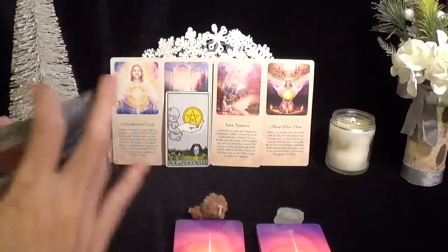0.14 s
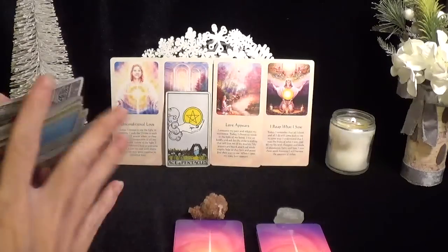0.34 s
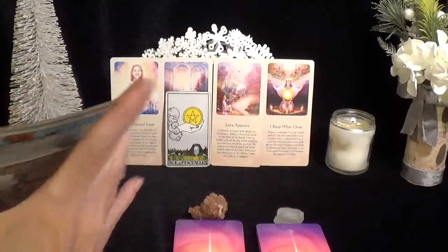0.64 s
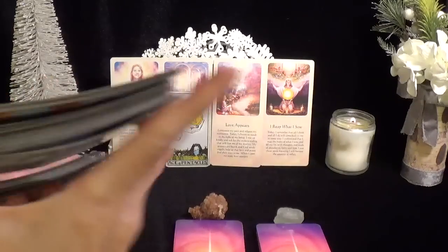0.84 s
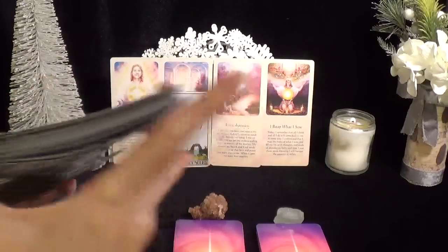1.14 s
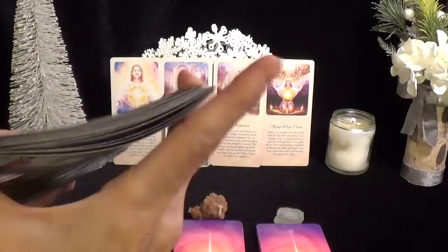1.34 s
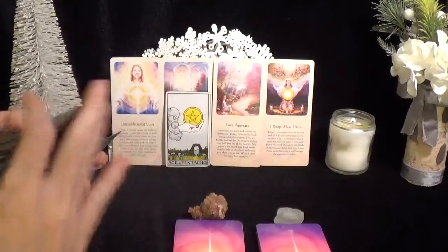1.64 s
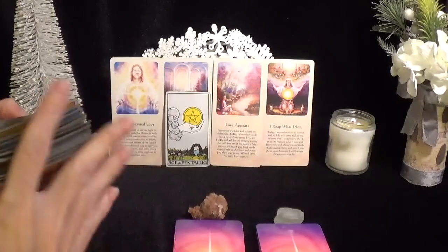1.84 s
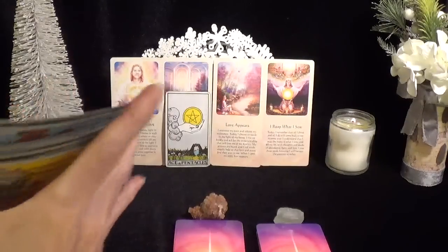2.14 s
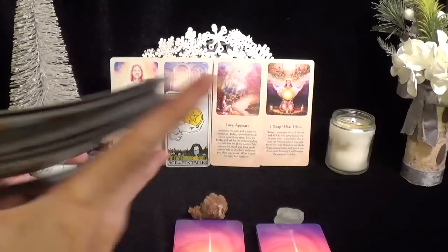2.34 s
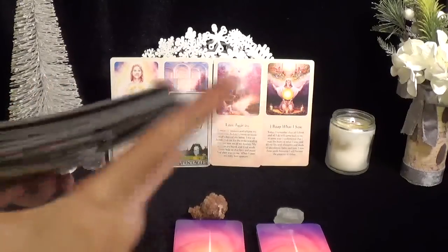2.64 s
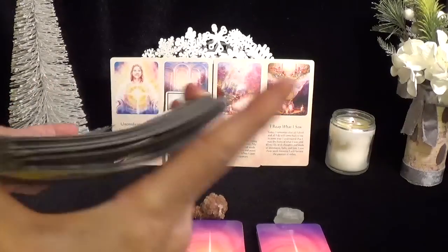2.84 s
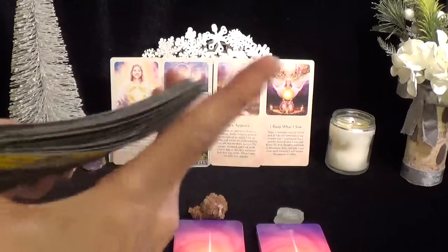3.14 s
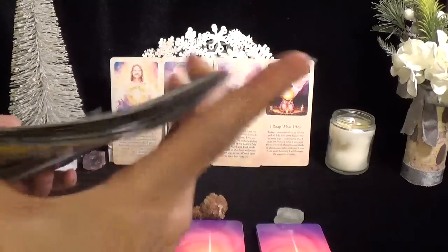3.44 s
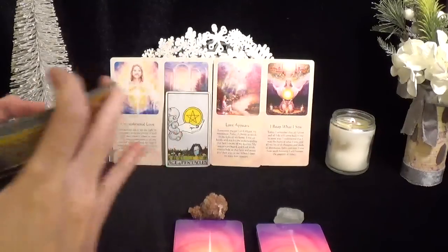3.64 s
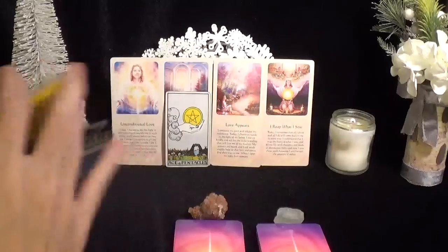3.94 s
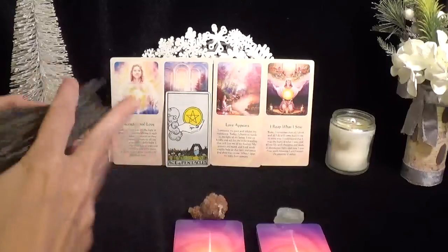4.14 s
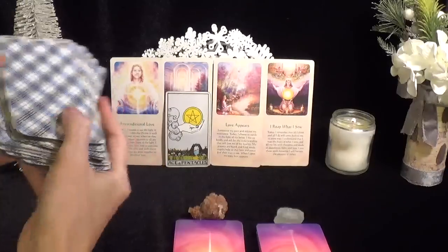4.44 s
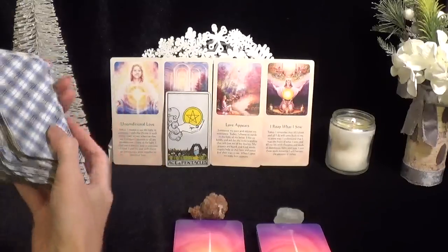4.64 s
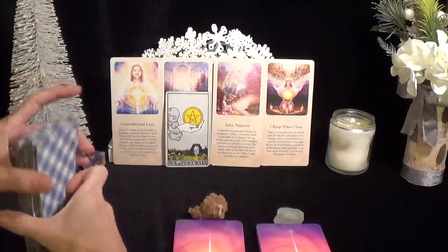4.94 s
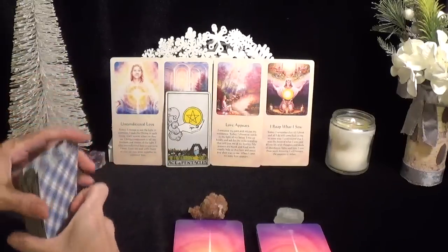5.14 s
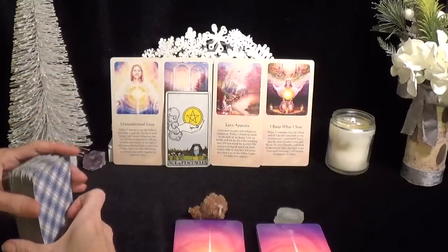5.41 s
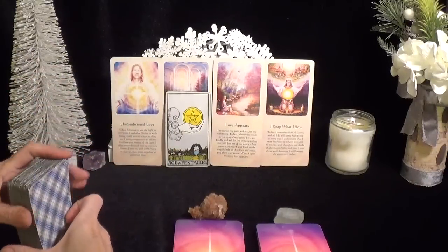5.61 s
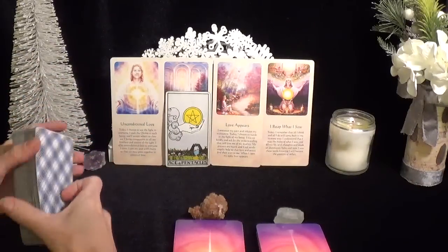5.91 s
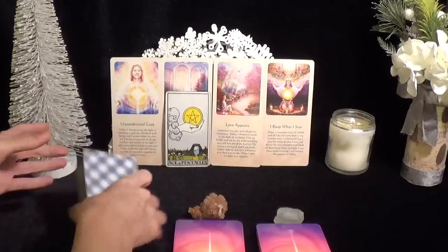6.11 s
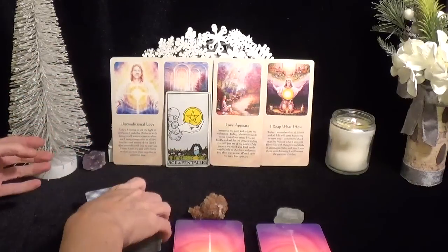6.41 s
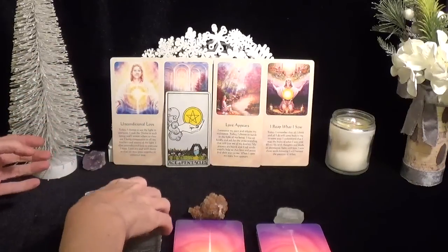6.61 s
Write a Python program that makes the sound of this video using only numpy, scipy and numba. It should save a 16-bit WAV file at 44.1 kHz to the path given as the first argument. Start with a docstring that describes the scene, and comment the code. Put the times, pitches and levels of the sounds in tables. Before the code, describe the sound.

From the start, stiff cards are shuffled by hand, close to the microphone and slightly to the left. Their faces slide with a dry, papery rub, edges snap free, and packets drop into the palm with small hollow thuds. The sharpest flurries of snaps come at about 1 to 1.5 seconds, 2.5 to 2.9 seconds and 3 to 3.7 seconds. After 4 seconds the handling thins to lighter slides and scattered clicks. At about 5.2 and 5.6 seconds the deck is knocked square on a wooden table, giving two soft, briefly ringing knocks, the first a little clattery. At 6.4 seconds it is laid down gently. The small room adds a slight, short echo. Underneath run quiet room air, a low hum and a very faint, rapid mechanical ticking, which stops with one slightly louder tick near 6.6 seconds.

```python
"""A quiet room hums; a camera ticks once a frame. For the first 5 s, close by and a little to the left,
hands shuffle stiff cards: faces rub in stick-slip strokes, edges snap free and ring, packets drop
into the palm with a hollow thud. From 5.2 s the deck is knocked square on a wooden table, ringing
the modes of the top; at 6.4 s it is laid down. The small room echoes cards and table.
At 6.6 s the camera stops with a last, louder tick."""
import sys
import numpy as np
from scipy import signal
from scipy.fft import rfft, irfft
from scipy.io import wavfile
from scipy.ndimage import uniform_filter1d
from numba import njit

SR = 44100
rng = np.random.default_rng(int(sys.argv[2]) if len(sys.argv) > 2 else 0)


def to_wav(s):
    """Save 16-bit WAV."""
    ch = np.atleast_2d(s).T  # columns
    pcm = np.round(np.clip(ch, -1, 1) * 32767)  # PCM
    wavfile.write(sys.argv[1], SR, pcm.astype(np.int16))


N = 298557

# room tone spectrum (frequency [Hz], relative density [dB])
AIR_SPECTRUM = [(15, -36.5), (25, -18), (54, -7), (128, -10), (192, -12.5), (247, -15.5), (274, -14.5),
                (651, -20.5), (819, -20), (1030, -21), (1300, -24.5), (3240, -28.5), (11000, -42),
                (14300, -59), (22000, -120)]
# low hum envelope (time [s], level [dB])
HUM_LEVELS = [(0, -65.5), (4.6, -65.5), (4.8, -78), (5.7, -58.5), (6.1, -73.5), (6.77, -79.5)]
# table top modes (frequency [Hz], gain [dB], t60 [s])
WOOD_MODES = [(129, 3.5, 0.13), (136.9, -5.5, 0.36), (146.6, -13.5, 0.39), (164.7, -10.5, .18),
              (217, -11.5, 0.13), (321, -14.5, 0.18), (542, -13.5, 0.18), (581, 3.5, 0.058),
              (668, -0.5, 0.036), (846, -13.5, 0.17), (966, -8.5, 0.075), (1267, -17, 0.079),
              (1490, -12, 0.041), (1880, -16.5, 0.07)]
# deck on table (time [s], strength [dB], push length [ms], edge clack [dB])
DECK_KNOCKS = [(5.202, -25, 0.25, -24.5), (5.212, -34, 1.4, -25.5), (5.223, -19.5, 1.12, -30),
               (5.245, -38, 0.59, -37), (5.569, -35.5, 1.4, -51), (5.576, -17, 2.67, -36.5),
               (5.596, -40, 0.99, -52), (5.998, -53.5, 1.85, -48), (6.399, -36, 4.3, -44.5)]
# packets landing in the palm (time [s], peak [dB], pitch [Hz])
PALM_THUDS = [(0.125, -49, 509), (0.258, -47, 483), (0.705, -41, 202.6), (0.968, -36.5, 189),
              (1.008, -40, 349), (1.288, -36.5, 424), (2.276, -45, 263), (2.529, -22.5, 514),
              (2.595, -44, 504), (3.384, -38.5, 405), (4.71, -40, 850)]
# fingers on the deck between strokes (time [s], level [dB], hiss re level [dB])
FINGER_LEVELS = [(0, -52.5, -3.5), (.7, -61.5, 4.5), (.9, -66, 1.5), (1.5, -64.5, 1.5), (1.7, -64, 6),
                 (2.1, -58.5, 0), (2.4, -65, -1.5), (3.5, -61.5, 1.5), (4.1, -57, -1.5), (4.4, -69, 8),
                 (4.75, -67.5, -3), (4.9, -72, 2.5), (5.8, -70, 2.5), (6.1, -77, 5), (6.77, -83.5, 10.5)]
# card faces sliding (start [s], hold [s], level [dB], hiss re level [dB])
SLIDE_STROKES = [(0.0, 0.0026, -47, -12), (0.085, 0.072, -48, -5), (0.19, 0.021, -45, 1),
                 (0.29, 0.025, -43.5, -1), (0.515, 0.017, -51, -12), (0.66, 0.14, -49.5, -2),
                 (0.775, 0.0069, -39.5, -3.5), (0.975, 0.016, -47, 1), (1.005, 0.0065, -35, -7),
                 (1.225, 0.066, -42, -23), (1.3, 0.022, -36, -13), (1.4, 0.025, -52.5, -17),
                 (1.515, 0.014, -31.5, -14), (1.56, 0.048, -46.5, -1), (1.7, .035, -55.5, -7),
                 (1.79, 0.055, -56.5, 4.5), (1.901, 0.035, -53, 6.5), (1.99, 0.0092, -55.5, 2.5),
                 (2.041, 0.024, -56, 0), (2.15, 0.032, -49.5, -11), (2.21, 0.053, -47, 3),
                 (2.473, .01, -46, -9), (2.482, 0.0038, -32, -8.5), (2.522, 0.0053, -29, -14),
                 (2.758, 0.019, -42.5, -19), (2.792, 0.031, -39, -9.5), (2.84, 0.035, -43.5, -15),
                 (3.05, 0.038, -54.5, -12), (3.093, 0.023, -34, -10), (3.122, 0.029, -36.5, -12),
                 (3.31, 0.072, -43.5, -12), (3.4, 0.032, -33, -30), (3.617, 0.011, -33.5, -27),
                 (3.655, 0.039, -38.5, -6), (3.715, 0.031, -46, -7), (3.787, 0.084, -53, -5.5),
                 (3.925, 0.062, -46, -2), (4.02, 0.037, -64, -20), (4.08, 0.022, -49.5, 3.5),
                 (4.155, 0.025, -44.5, -14), (4.22, 0.023, -57, 0), (4.33, 0.023, -54, -4.5),
                 (4.48, 0.06, -69, 2), (4.619, .05, -59.5, 5.5), (4.698, 0.03, -45.5, -4.5),
                 (4.99, 0.058, -65.5, 5), (5.21, 0.052, -62, 5.5), (5.386, 0.015, -67, 7),
                 (5.578, 0.012, -64, 5.5), (5.864, 0.028, -66, -1), (5.995, 0.0061, -62.5, 7),
                 (6.385, 0.015, -70.5, 9.5), (6.465, 0.012, -64, 3)]
# card modes (frequency [Hz], width [Hz], gain [dB])
CARD_RESONANCES = [(510, 40, 1), (1351, 270, 4), (2220, 1300, 3), (2980, 850, -1.5), (3800, 2300, -6)]
# card edges snapping free; final row: the camera's last, louder tick as it stops
# (time [s], ring peak [dB], ring [Hz], crack re ring [dB], slap re ring [dB])
CLICKS = [(0.046, -35.5, 2200, 3, -15), (0.2641, -37, 1368, -14, -3), (0.7048, -38, 3520, 6.5, -7),
          (0.771, -25, 1355, -1.5, -13), (0.7854, -25.5, 2546, 2, -7), (0.9636, -30, 1370, -11, -10),
          (0.9693, -22.5, 1334, 3.5, -9), (1.0041, -24, 4820, -9, -33), (1.0085, -18.5, 1350, -5, -10),
          (1.0503, -28.5, 2460, -19, -13), (1.0608, -30, 1210, -7, -8), (1.2184, -7.5, 2200, -11.5, -22),
          (1.2219, -10.5, 2250, -10.5, -20.5), (1.2918, -23, 1455, -0.5, -11),
          (1.3228, -23, 2280, -20, -11.5), (1.3298, -21, 1850, -9, -15), (1.3695, -37, 1231, 4, 3),
          (1.4956, -26, 2700, -17, -10.5), (1.5088, -25, 2550, -8, -23), (1.5327, -22, 2890, 4, -40),
          (1.5921, -36.5, 2350, 7, -2.5), (1.7951, -43, 3870, 7, -8), (2.0934, -43.5, 1484, 6, -25),
          (2.186, -33, 2597, 4, -29), (2.22, -35.5, 3670, 14.5, -27), (2.273, -34.5, 3640, -3, 1),
          (2.4614, -26, 3720, -14, -15), (2.4816, -16, 2750, -0.5, -13), (2.4896, -17.5, 1340, -5.5, -22),
          (2.5112, -17, 2340, -1.5, -8.5), (2.5228, -14, 2490, -15, -12), (2.5274, -12, 2180, -15, -15),
          (2.5358, -25, 2500, -12.5, -1.5), (2.741, -10, 2160, -37, -20.5), (2.7488, -24, 1965, -17, -13),
          (2.7642, -23, 1250, -26, -15), (2.784, -19, 1320, -30, -31), (2.8065, -24, 3110, -21, -10),
          (2.814, -21, 1870, -22, -15.5), (2.8613, -25, 2620, -31.5, -8), (2.8861, -31, 1350, -4, -6.5),
          (3.0437, -29, 2340, -3.5, -13), (3.0533, -20.5, 2530, -28, -18), (3.0927, -16.5, 2986, 1, -6.5),
          (3.1071, -10.5, 4800, 0, -40), (3.124, -17, 3180, -17, -30), (3.138, -20, 2800, -11, -24),
          (3.146, -16, 2970, -32, -29), (3.298, -34.5, 2265, -9, -5), (3.3081, -21.5, 1430, -6, -17.5),
          (3.3193, -22.5, 2540, -17.5, -21), (3.3517, -23.5, 3088, 0, -16), (3.3996, -18.5, 3166, -24, -27),
          (3.434, -19.5, 3080, -30, -37), (3.6079, -22.5, 2290, -10, -10), (3.6134, -22.5, 3240, -14, -30),
          (3.6407, -22, 1990, -25, -21), (3.6501, -19.5, 3770, 4.5, -42), (3.6575, -21, 2200, -12, -40),
          (3.6634, -18, 3800, 7.5, -37), (3.6697, -19, 3820, -0.5, -34), (3.702, -30, 2430, -17, -32),
          (3.787, -42, 2500, 3, -20), (3.843, -36, 1360, 1.5, -17), (3.925, -34, 2080, -15, -9),
          (4.072, -18, 2680, 2, -17), (4.162, -34, 1560, 1, -14), (4.191, -32, 1550, -2, -16),
          (4.222, -39, 2155, 1, -9), (4.275, -45, 1700, -5, -9), (4.295, -46.5, 1700, 12, -5),
          (4.352, -42.5, 1110, 2, -9), (4.492, -49, 897, -6, -0.5), (4.7011, -38.5, 2055, 7, -7),
          (4.9379, -30.5, 2490, 0, -12), (5.011, -48, 2500, 5, -20), (5.6767, -55, 1550, 10, 10.5),
          (6.584, -48.5, 3100, -12, -32)]

LEFT_RIGHT = np.array([[1], [-1]])
AIR_DB, HUM_HZ, HUM_WIDTH_HZ = -61, 65, 8.9
TICK_START_S, TICK_END_S, TICKS_PER_S = .0012, 6.56, 29.97
TICK_HZ, TICK_WIDTH_HZ, TICK_DB = 3230, 120, -57.5
ROOM_T60_S, ROOM_DAMP, ROOM_DB, ROOM_WIDTH = 0.25, 0.64, -9.5, 0.57
PAN_DB, PAN_FROM_HZ, SCATTER_DB = 3.2, 300, -11.5
PUFF_T60_S, THUD_WIDTH_HZ = .035, 70
RISE_DB_PER_S, LIGHT_DB, RISE_DOUBLES_DB = 600, -50.5, 11.5  # strokes above LIGHT_DB rise faster
FALL_DB_PER_S, SETTLE_DB, SETTLE_DB_PER_S = 550, -14, 153
FLUTTER_PER_S, FLUTTER_FROM_DB = 70, -50
FLUTTER_DB, FLUTTER_SCATTER_DB, FLUTTER_CRACK_DB, FLUTTER_SLAP_DB = 2.5, 2.5, -15, -21
CLICK_T60_S, CLICK_REF_HZ, CLICK_T60_SLOPE, CLICK_T60_SPREAD = 0.018, 2300, 0.49, 0.36
CUTOFF_HZ = 10900


def undb(db):
    """dB to gain."""
    return 10 ** (np.asarray(db) / 20)


def unit(x):
    """Scale to rms 1."""
    return x / np.sqrt(np.mean(x ** 2))


def band(x, hz, width_hz):
    """Two-pole resonance, gain 1 at centre."""
    hz = min(hz, .4 * SR)
    return signal.lfilter(*signal.iirpeak(hz, hz / width_hz, fs=SR), x)


def highpass(x, hz, order=2):
    """Gentle high-pass."""
    return signal.lfilter(*signal.butter(order, hz, "high", fs=SR), x)


def wander(rate_hz):
    """Slewed random steps, spread near 1."""
    hold = int(SR / rate_hz)
    steps = np.repeat(rng.standard_normal(N // hold + 1), hold)[:N]
    return 1.2 * uniform_filter1d(steps, hold)


def add(out, start_s, sound):
    """Mix a sound in at start_s."""
    i = int(start_s * SR)
    out[i:i + len(sound)] += sound[:N - i]


def room_tone():
    """Room air and microphone hiss, mostly mid, over a narrow wavering hum."""
    hz, db = np.transpose(AIR_SPECTRUM)
    bins_hz = np.maximum(np.arange(N // 2 + 1) * SR / N, 1)
    shape = undb(np.interp(np.log(bins_hz), np.log(hz), db))
    mid, side = (irfft(rfft(rng.standard_normal(N)) * shape, N) for _ in range(2))
    air = unit(mid + 0.67 * LEFT_RIGHT * highpass(side, 160))
    hum = band(band(rng.standard_normal(N), HUM_HZ, HUM_WIDTH_HZ), HUM_HZ, 2 * HUM_WIDTH_HZ)
    hum_db = np.interp(np.arange(N) / SR, *np.transpose(HUM_LEVELS))
    return undb(AIR_DB) * air + undb(hum_db) * unit(hum)


def camera_ticks():
    """A small mechanism steps once a frame and rings briefly."""
    pulses = np.zeros(N)
    at = (np.arange(TICK_START_S, TICK_END_S, 1 / TICKS_PER_S) * SR).astype(int)
    pulses[at] = undb(0.78 * rng.standard_normal(N)[at])
    ring = band(pulses, TICK_HZ, TICK_WIDTH_HZ)
    return undb(TICK_DB) * ring * SR / (2 * np.pi * TICK_WIDTH_HZ)


@njit
def walls(x, lags, gain, damp):
    """Eight cross-fed delay lines, duller each round."""
    line, dulled, out = np.zeros((8, 4096)), np.zeros(8), np.zeros((2, len(x)))
    for i in range(len(x)):
        total = 0.
        for k in range(8):
            dulled[k] += (1 - damp) * (gain[k] * line[k, (i - lags[k]) & 4095] - dulled[k])
            total += dulled[k]
            out[k % 2, i] += dulled[k]
        for k in range(8):
            line[k, i & 4095] = x[i] + dulled[k] - total / 4
    return out


def room_echo(x, lags):
    """Wall reflections at two close microphone ports: narrow, mono in the bass."""
    loop_gain = undb(-60 * lags / SR / ROOM_T60_S)
    left, right = walls(x + 1e-18, lags, loop_gain, ROOM_DAMP)
    side = ROOM_WIDTH * LEFT_RIGHT * highpass(left - right, 303)
    return undb(ROOM_DB) * (left + right + side) / 2


def mic_ports(x):
    """Treble leans left; the camera body scatters it differently into each port."""
    t = np.arange(1024) / SR
    scatter = rng.standard_normal(len(t)) * np.exp(-t / .006)
    lean = np.tanh(PAN_DB * np.log(10) / 40) * x
    side = lean + undb(SCATTER_DB) * signal.fftconvolve(x, scatter / np.linalg.norm(scatter))[:N]
    return x + LEFT_RIGHT * highpass(side, PAN_FROM_HZ, order=1)


def table_knocks():
    """The deck edge clacks and rings the top; longer pushes excite fewer high modes."""
    out, t = np.zeros(N), np.arange(SR // 2) / SR
    hz, db, t60_s = np.transpose(WOOD_MODES)[:, :, None]
    onset = 1 - np.exp(-t * hz / 0.68)  # about a cycle to start swinging
    modes = -undb(db) * np.sin(2 * np.pi * hz * t) * undb(-60 * t / t60_s) * onset
    for start_s, blow_db, push_ms, clack_db in DECK_KNOCKS:
        wood = np.sum(modes / (1 + (hz * push_ms / 1000) ** 2), axis=0)
        clack = band(band(rng.standard_normal(len(t)), 1140, 1100), 1100, 970) * np.exp(-t / 0.013)
        add(out, start_s, undb(blow_db) * wood + undb(clack_db) * clack)
    return highpass(out, 141)  # the top radiates no deep bass


def palm_thuds():
    """Air trapped between palm and packet rings for a few cycles."""
    out, t = np.zeros(N), np.arange(8192) / SR
    for start_s, db, hz in PALM_THUDS:
        puff = rng.standard_normal(len(t)) * undb(-60 * t / PUFF_T60_S)
        ring = band(band(puff, hz, THUD_WIDTH_HZ), hz, hz / 2)
        add(out, start_s, undb(db) * ring / np.abs(ring).max())
    return out


def stroke_levels():
    """Rub and hiss envelopes [dB]: strokes rise, hold, fall and settle over the finger noise."""
    t = np.arange(0, N + 64, 64) / SR
    finger_s, finger_db, finger_hiss_db = np.transpose(FINGER_LEVELS)
    start_s, hold_s, top_db, hiss_db = np.transpose(SLIDE_STROKES)[:, :, None]
    before_s, after_s = np.maximum(start_s - t, 0), np.maximum(t - start_s - hold_s, 0)
    fade = undb(-FALL_DB_PER_S * after_s) ** 2 + undb(SETTLE_DB - SETTLE_DB_PER_S * after_s) ** 2
    rise_db_per_s = RISE_DB_PER_S * 2 ** (np.maximum(top_db - LIGHT_DB, 0) / RISE_DOUBLES_DB)
    power = fade * undb(top_db - rise_db_per_s * before_s) ** 2
    rub = power.sum(axis=0) + undb(np.interp(t, finger_s, finger_db)) ** 2
    hiss = (power * undb(hiss_db) ** 2).sum(axis=0)
    hiss += undb(np.interp(t, finger_s, finger_db + finger_hiss_db)) ** 2
    return [np.interp(np.arange(N) / SR, t, 10 * np.log10(p)) for p in (rub, hiss)]


def card_slide(rub_db, hiss_db):
    """Stick-slip friction: uneven grains ring the cards, with hiss above and rustle below."""
    judder = np.clip((rub_db + 59) / 18, .15, 1)  # light strokes glide, hard ones judder
    grip = undb(judder * (3.74 * wander(90) + 0.97 * wander(400)))

    def grains():
        return rng.standard_normal(N) * grip

    # the moving contact feeds each mode unevenly
    body = sum(undb(db + 4.1 * wander(25)) * band(grains(), hz, width_hz)
               for hz, width_hz, db in CARD_RESONANCES)
    # hiss colour shifts with the angle between faces
    hiss = sum(undb(4.6 * wander(16)) * band(band(grains(), hz, hz / 2.4), hz, hz)
               for hz in (4200, 5400, 6460, 8200, 9740))
    rustle = undb(4.1 * wander(20)) * highpass(band(grains(), 200, 430), 102)
    return undb(rub_db) * (unit(body) + undb(-13) * unit(rustle)) + undb(hiss_db) * unit(hiss)


def edge_flutter(rub_db):
    """Small edges snap at random during firm strokes, each ringing one upper card mode."""
    when, mode, size = rng.random((int(FLUTTER_PER_S * N / SR), 3)).T
    stroke_db = rub_db[(when * N).astype(int)]
    peak_db = stroke_db + FLUTTER_DB - FLUTTER_SCATTER_DB * np.log(1 - size)
    modes_hz = np.array(CARD_RESONANCES)[1:, 0]
    ring_hz = modes_hz[(mode * len(modes_hz)).astype(int)]
    edges = np.column_stack([when * N / SR, peak_db, ring_hz])[stroke_db > FLUTTER_FROM_DB]
    return clicks([(*edge, FLUTTER_CRACK_DB, FLUTTER_SLAP_DB) for edge in edges])


def clicks(rows):
    """Freed card edge or last camera tick: tiny impacts ring a mode; crack above, air slap below."""
    out, t = np.zeros(N), np.arange(4096) / SR
    for start_s, db, hz, crack_db, slap_db in rows:
        noise = rng.standard_normal((3, len(t)))
        t60_s = CLICK_T60_S * (CLICK_REF_HZ / hz) ** CLICK_T60_SLOPE  # higher rings die sooner
        t60_s *= np.exp(CLICK_T60_SPREAD * rng.standard_normal())
        fade = undb(-60 * t / np.clip(t60_s, .003, .09))
        ring = band(noise[0] * fade, hz, hz / 5.6)
        crack = band(band(noise[1] * fade ** 2.4, 4300, 6400), 4600, 6000)
        slap = band(band(noise[2] * fade ** 0.47, 500, 560), 280, 1000)
        ring, crack, slap = (part / np.abs(part).max() for part in (ring, crack, slap))
        add(out, start_s, undb(db) * (ring + undb(crack_db) * crack + undb(slap_db) * slap))
    return out


def scene():
    """Cards and last tick left, table centre, all echoed, over frame ticks and room tone."""
    background = camera_ticks() + room_tone()
    table = table_knocks()
    wall_lags = rng.integers(300, 2200, size=8)  # samples
    rub_db, hiss_db = stroke_levels()
    near = card_slide(rub_db, hiss_db) + clicks(CLICKS) + palm_thuds() + edge_flutter(rub_db)
    echo = room_echo(near + highpass(table, 152), wall_lags)
    return background + echo + table + mic_ports(near)


def record(dry):
    """Steep low-pass: no treble above about 11 kHz."""
    return signal.sosfilt(signal.ellip(10, .5, 64, CUTOFF_HZ, fs=SR, output="sos"), dry)


dry = scene()
out = record(dry)
to_wav(out)
```